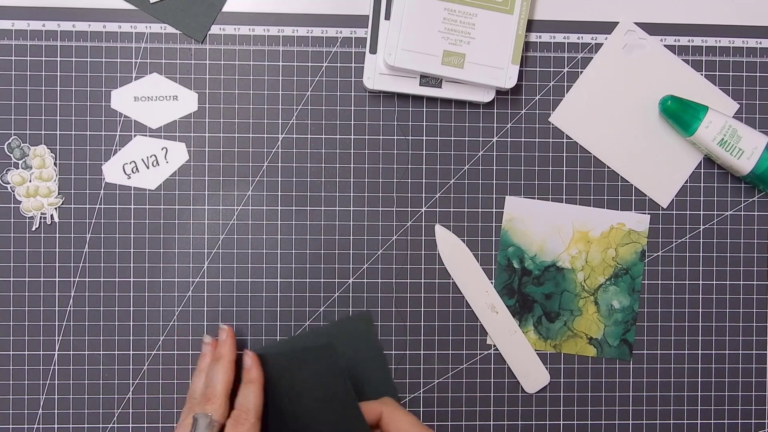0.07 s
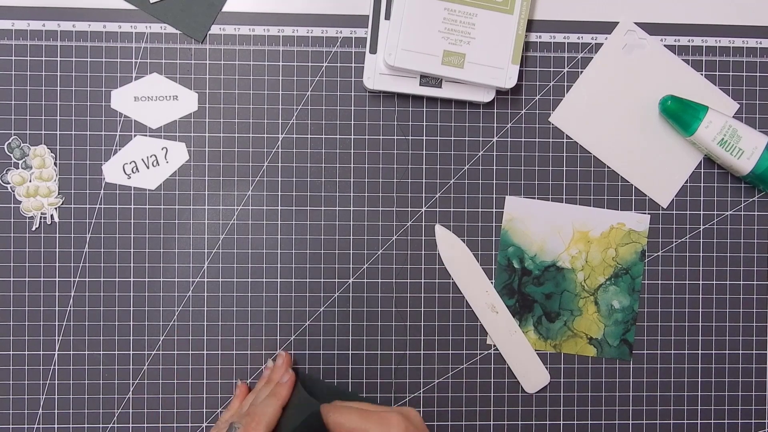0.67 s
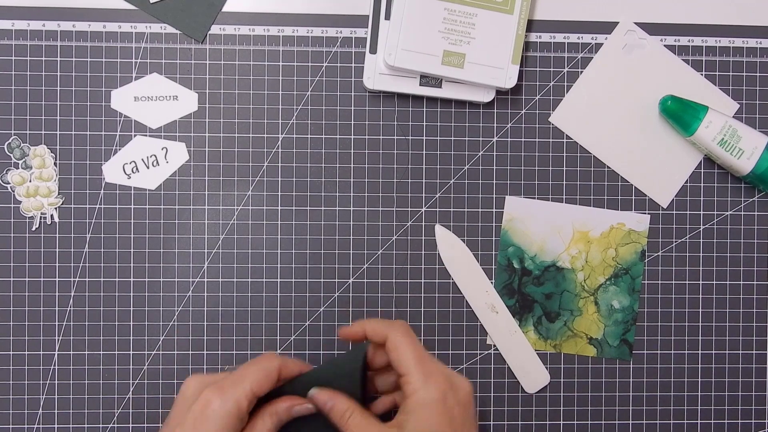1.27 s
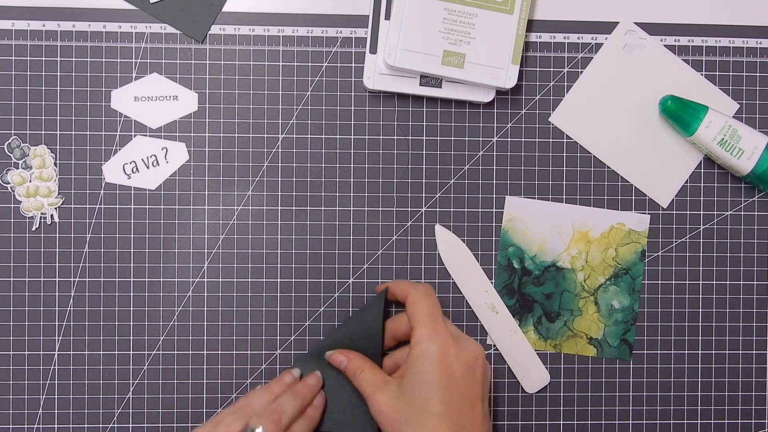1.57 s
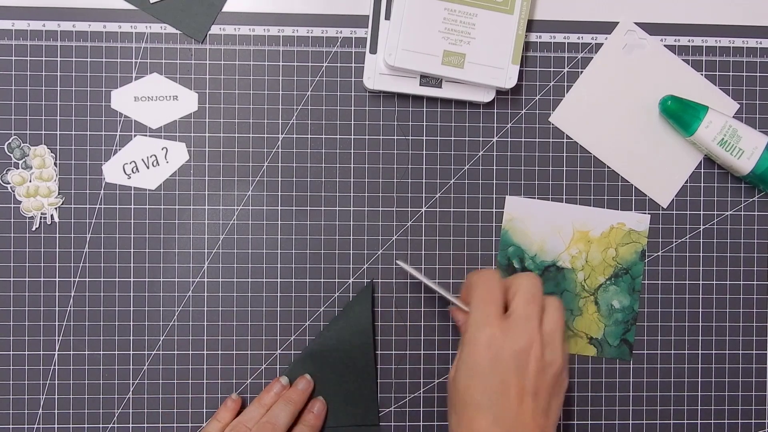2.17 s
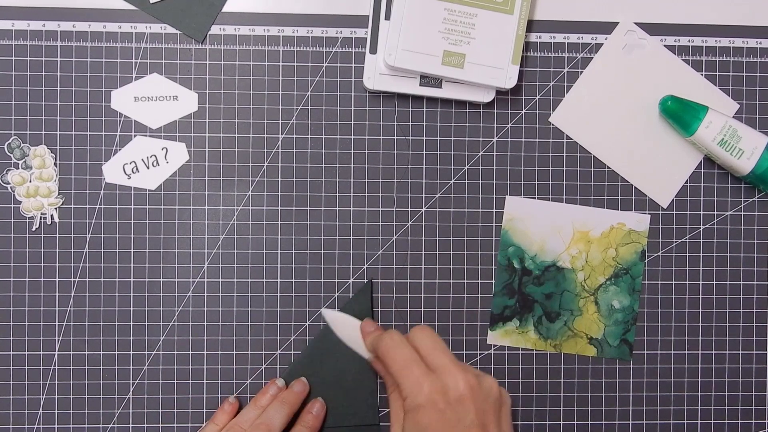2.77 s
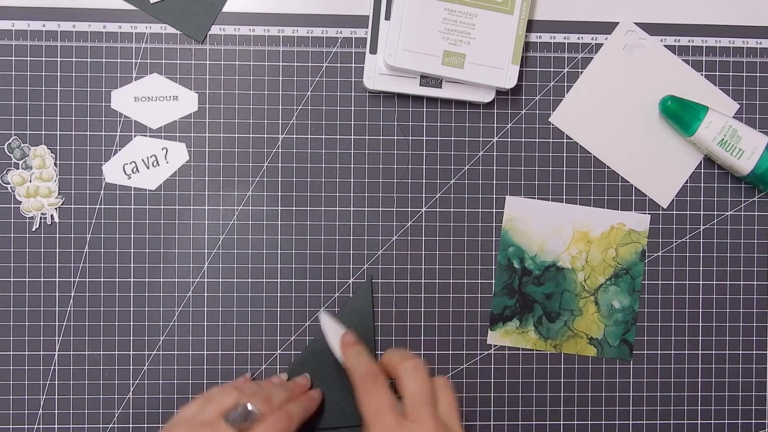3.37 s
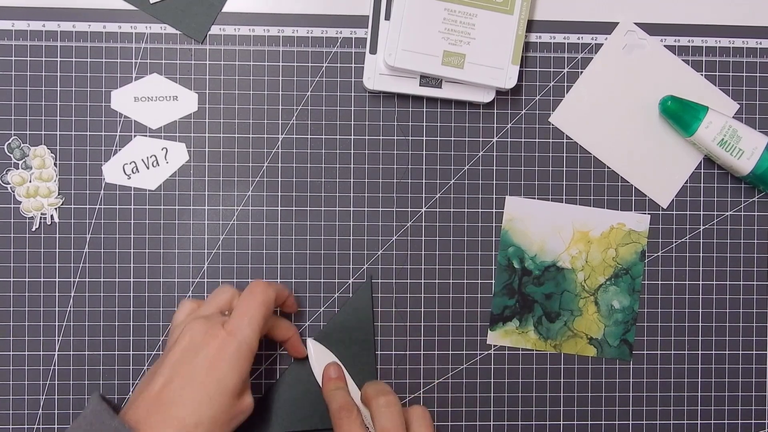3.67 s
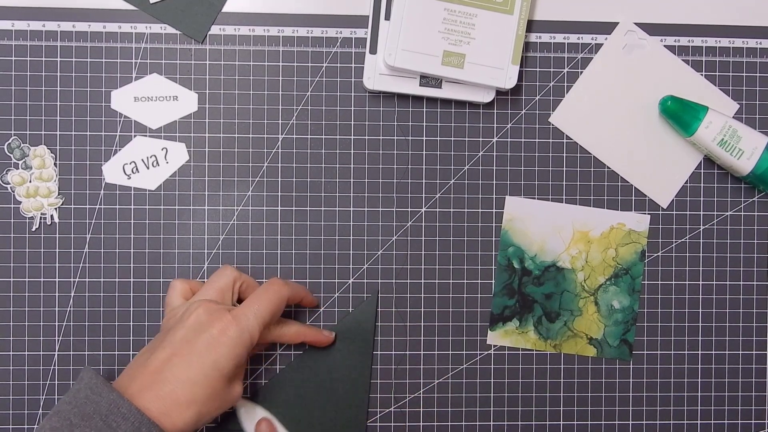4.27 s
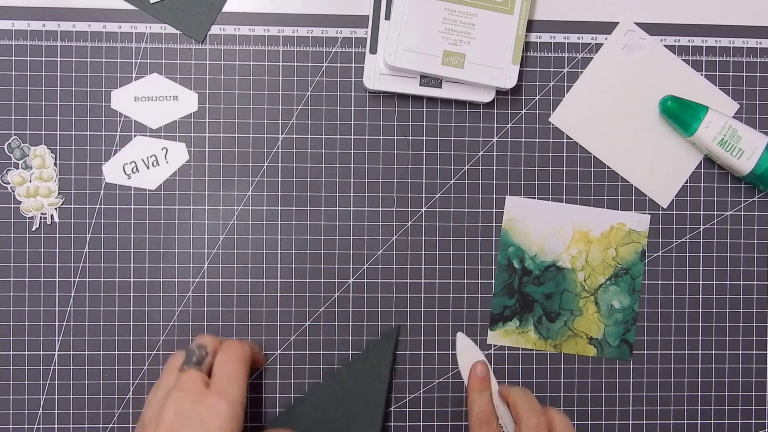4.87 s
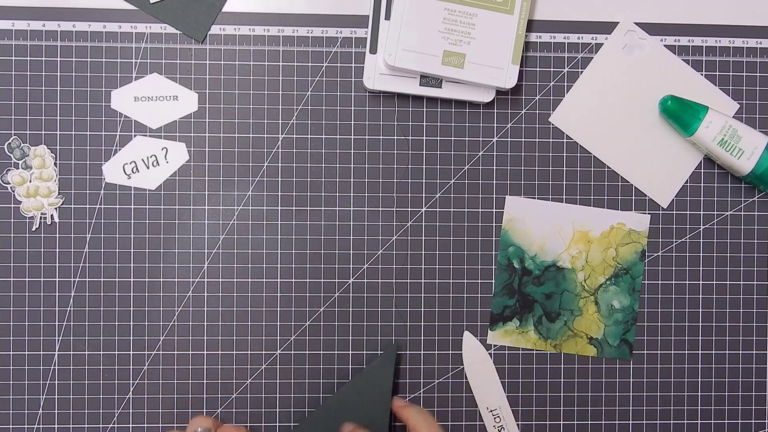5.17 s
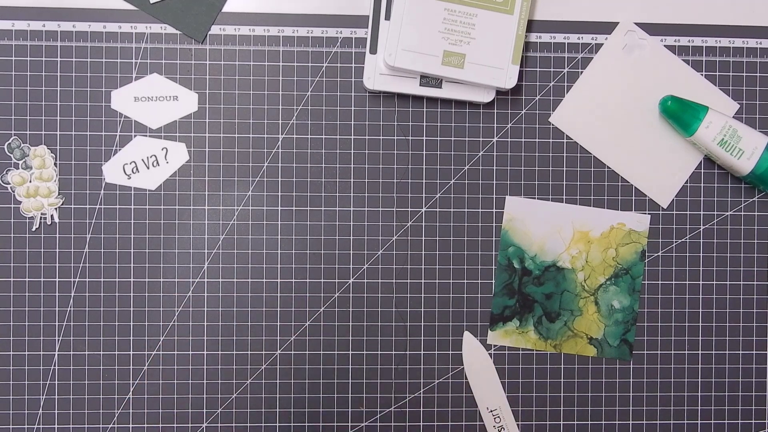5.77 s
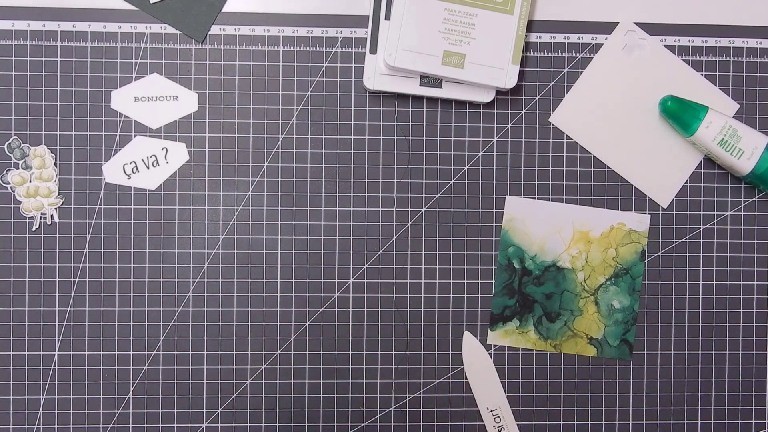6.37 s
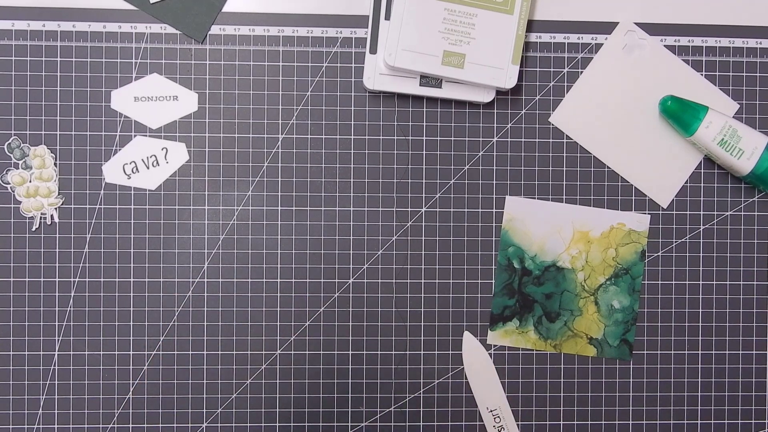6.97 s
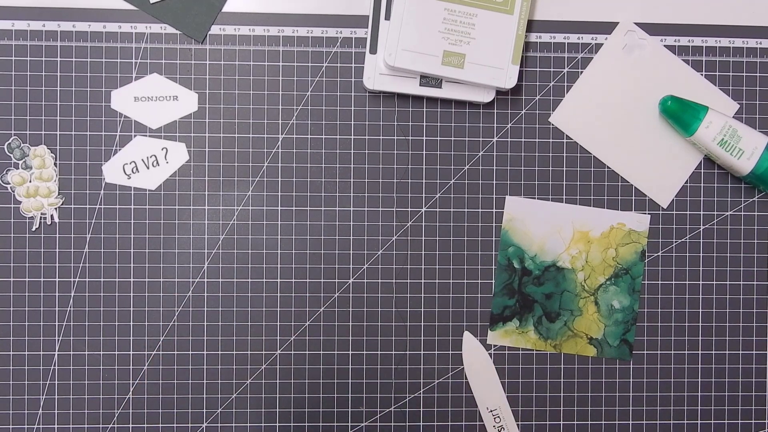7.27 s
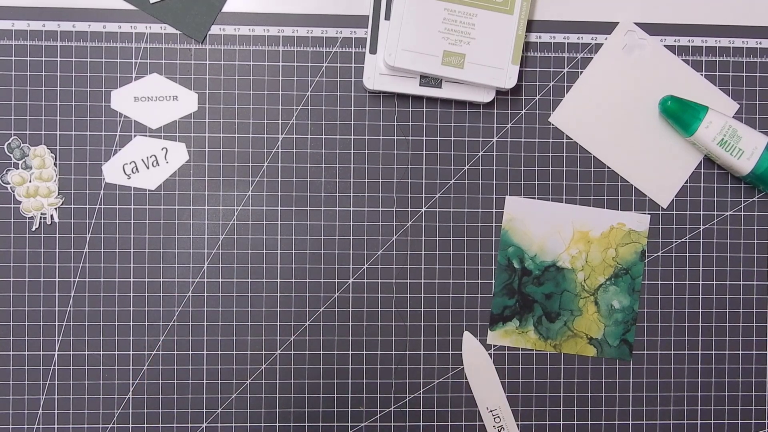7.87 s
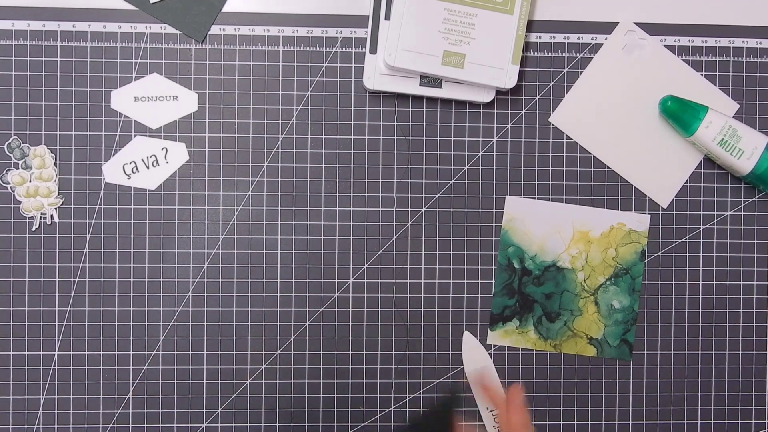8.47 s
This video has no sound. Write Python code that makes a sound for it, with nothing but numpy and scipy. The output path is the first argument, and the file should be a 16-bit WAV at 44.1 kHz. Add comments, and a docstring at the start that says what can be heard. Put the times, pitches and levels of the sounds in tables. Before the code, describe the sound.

Stiff cardstock is folded and creased by hand, rubbing, swishing and snapping, with light knocks on a cutting mat.

```python
"""Folding cardstock on a cutting mat.

A sheet is folded and its creases are pressed down with a bone folder. The stiff card snaps as it
buckles; friction makes it swish, rub and hiss under the fingers, and it ticks as it flexes.
Hands and folder knock on the mat, and the desk below rings.
A small room with a steady hiss is heard through a close pair of microphones."""
import sys
import numpy as np
from scipy import signal
from scipy.fft import rfft, irfft, next_fast_len
from scipy.io import wavfile

SR = 44100
rng = np.random.default_rng(int(sys.argv[2]) if len(sys.argv) > 2 else 0)


def unload_wav(signal):
    """Save mono or channel-first audio to the path in sys.argv[1] as 16-bit WAV at rate SR, clipped to [-1, 1]."""
    wavfile.write(
        sys.argv[1],
        SR,
        np.round(np.clip(np.atleast_2d(signal).T, -1, 1) * 32767).astype(np.int16),
    )


N = 380141
SHORT = 2 ** 14  # samples in one contact or room tail

# Resonances of the card on the mat. Each row: centre in Hz, width in Hz, lift in dB (negative: slight dip).
CARD_RESONANCES = [(299, 6.6, 17.5), (427, 59, 8.5), (1773, 13, 6), (2515, 74, 8), (2834, 150, 9.5),
                   (3216, 45, 17), (3486, 69, 12.5), (5280, 130, -20)]
# Each row: frequency in Hz, relative level in dB.
SNAP_SPECTRUM = [(50, -38), (170, -10), (500, -15), (1400, -25), (2300, -12), (3200, -5.5), (4000, -6),
                 (5200, 0.5), (9000, -13.5), (15000, -22)]
# Each row: start in seconds, chatter t60 in seconds, main resonance in Hz, ring level in dB,
# brightness in dB, focus in dB.
CARD_SNAPS = [(1.8015, 0.035, 4570, -32.5, 0, 1), (1.8457, 0.033, 3230, -17, 1, 6.5),
              (2.569, 0.066, 3020, -30, -1, 9.5), (3.472, 0.026, 2840, -44.5, -4, 12),
              (3.5941, 0.0087, 3020, -28.5, 1, 10), (4.692, 0.022, 2550, -43.5, -7, 8.5),
              (4.8066, 0.061, 2440, -23.5, -2.5, 9.5), (4.8338, 0.028, 2620, -29.5, -6, 6),
              (5.269, 0.036, 2720, -34, -6, 18), (5.4236, 0.04, 3260, -21.5, -2, 13.5),
              (5.4962, 0.02, 2200, -41, -12.5, 6), (5.617, 0.044, 2940, -34.5, -5, 2.5),
              (5.988, 0.033, 814, -47.5, -9.5, 7), (6.353, 0.018, 2820, -50, -2, 10),
              (6.925, 0.037, 3030, -53.5, -6, -3), (6.9733, 0.017, 2440, -44.5, -5, 0),
              (7.0064, 0.032, 755, -49, -8, 5), (7.4463, 0.037, 2420, -50, -7.5, 2),
              (7.986, 0.12, 2110, -42, -11, 10), (8.054, .03, 2550, -41.5, 4.5, 11),
              (8.3645, 0.031, 3000, -27.5, 6, 3.5), (8.5882, 0.037, 2950, -25.5, 0.5, 9)]


def snaps():
    """The stiff card buckles or an edge flicks free: it lets go all at once and rings."""
    out = np.zeros(N)
    for start_s, t60_s, main_hz, ring_db, bright_db, focus_db in CARD_SNAPS:
        force = chatter(t60_s, crack=0.32, grain=0.28, rise_s=0.00045)
        response = body(SNAP_SPECTRUM, [*CARD_RESONANCES, damped(main_hz, lift_db=17)], bins(SHORT))
        levels_db = register_levels(ring_db, bright_db, weight_db=-20, focus_db=focus_db)
        add(out, excite(force, response, levels_db), start_s)
    return out


# Each row: frequency in Hz, relative level in dB.
STROKE_SPECTRUM = [(50, -31), (200, -14), (380, -2), (700, 1.5), (1400, 2), (2700, 2.5), (3400, -3),
                   (4000, 1.5), (6000, -2.5), (10000, -11.5), (15000, -22.5)]
# Each row: peak time in seconds, rise in seconds, main resonance in Hz, ring level in dB,
# brightness in dB, weight in dB.
SHORT_STROKES = [(0.999, 0.094, 1040, -47.5, -11, 2.5), (1.25, 0.024, 660, -28.5, 1.5, -9),
                 (1.338, .02, 404, -39, 0, -2), (1.411, 0.013, 1540, -44, -13, -16),
                 (1.647, 0.0085, 2660, -39, 1.5, -15), (1.784, 0.023, 2750, -32.5, -0.5, -6),
                 (1.85, 0.038, 3380, -29.5, 6.5, -22), (2.265, 0.014, 495, -42, -9, 3),
                 (2.304, 0.02, 920, -35.5, -7.5, 0), (2.337, 0.01, 483, -29, -4.5, 5),
                 (2.366, 0.031, 1900, -21, -6.5, -7), (2.594, 0.022, 2820, -34, 1.5, -26),
                 (2.758, 0.026, 3100, -42.5, 1, -19), (2.797, 0.015, 2840, -41.5, 0, -25),
                 (3.613, 0.02, 3330, -32, 2, -11.5), (3.719, 0.048, 3100, -35.5, 4.5, -14),
                 (3.891, 0.016, 305, -39.5, -3.5, -0.5), (3.988, 0.033, 179, -38.5, 5.5, -12),
                 (4.845, 0.025, 2560, -34.5, -3, 3), (4.988, 0.023, 160, -26.5, -2, 3),
                 (5.323, 0.021, 2450, -31, -2, -20), (5.39, 0.051, 2900, -35, 3.5, -7),
                 (5.456, 0.025, 3310, -34.5, 0.5, -35), (5.53, 0.016, 1850, -30.5, -4.5, -24),
                 (5.639, 0.02, 3310, -43, -10.5, 6), (5.936, 0.037, 3180, -39, 4.5, -30),
                 (6.042, 0.0098, 694, -40.5, -10, -3.5), (6.159, 0.067, 3430, -42.5, 15, -28),
                 (6.368, 0.015, 2830, -32, 2.5, -8), (6.407, 0.022, 443, -53.5, -7, 19.5),
                 (6.465, 0.0037, 354, -47.5, 2, 10), (6.525, 0.037, 3180, -37.5, 5.5, -16),
                 (6.646, 0.0085, 340, -46.5, -2, 0.5), (7.067, 0.019, 490, -50.5, -10, 17),
                 (7.142, 0.025, 500, -34.5, -0.5, -13), (7.17, 0.011, 326, -31, -4.5, 10),
                 (7.545, 0.023, 2480, -27.5, 1, -13), (7.768, 0.016, 387, -43.5, 0.5, 1.5),
                 (7.996, 0.026, 2650, -46, -3, -25), (8.387, 0.037, 3230, -27.5, 4, -9),
                 (8.539, 0.036, 2880, -30, -1, -19), (8.607, 0.019, 2940, -21, 0.5, -11.5)]


def strokes():
    """Friction follows the speed of each short scrape; the free span of card sets the main resonance."""
    out = np.zeros(N)
    t = (np.arange(SHORT) - SHORT // 2) / SR
    for peak_s, rise_s, main_hz, ring_db, bright_db, weight_db in SHORT_STROKES:
        speed = swell(t, rise_s, fall_s=1.05 * rise_s, steepness=1.94)
        force = speed * fibres(SHORT, slips_per_s=1800, spread_db=0.5, grain=0.29)
        response = body(STROKE_SPECTRUM, [*CARD_RESONANCES, damped(main_hz, lift_db=11)], bins(SHORT))
        levels_db = register_levels(ring_db, bright_db, weight_db, focus_db=5.5)
        add(out, excite(force, response, levels_db), peak_s + t[0])
    return out


# Resonances of desk and mat. Each row: centre in Hz, width in Hz, lift in dB.
DESK_RESONANCES = [(172, 44, 9), (327, 10.3, 19.5), (460, 75, 8), (748, 180, 8), (1072, 34, 10.5),
                   (1730, 23, 2.5), (2420, 190, 4.5), (3070, 140, 6.5)]
# Each row: frequency in Hz, relative level in dB.
KNOCK_SPECTRUM = [(35, -25), (75, -13.5), (150, -5), (240, -9.5), (420, -5), (900, -8), (1600, -6.5),
                  (2900, -8), (4100, -12.5), (7000, -18), (12000, -21), (16000, -39)]
# Each row: start in seconds, chatter t60 in seconds, main resonance in Hz, ring level in dB,
# brightness in dB, weight in dB.
MAT_KNOCKS = [(1.2254, 0.049, 1880, -31.5, -10, -21), (1.4915, 0.04, 314, -36.5, -14.5, 6.5),
              (1.571, 0.052, 1150, -42.5, -12, 1.5), (2.15, 0.16, 177, -44, -3.5, 11),
              (2.3249, 0.074, 110, -32, -13.5, 6), (2.6068, 0.0098, 1190, -30, -4, -5),
              (3.2975, 0.027, 436, -21, -1, -10.5), (3.969, 0.07, 250, -45, -7, 9.5),
              (4.616, 0.037, 154, -44, -4.5, 18), (4.749, .023, 298, -37, -4.5, 2.5),
              (4.969, 0.062, 300, -25, -7, -1), (4.9915, .06, 2610, -18, -3, -7),
              (5.111, 0.021, 3200, -25.5, -4, -5.5), (5.1332, 0.036, 2700, -30, -5.5, -5),
              (7.1217, 0.063, 3260, -38, -7, -3), (7.164, .02, 1770, -33, -5.5, -17),
              (7.751, 0.021, 374, -56, 2, 17.5)]


def knocks():
    """Hands and folder hit the mat and ring the desk; where each lands sets the main resonance."""
    out = np.zeros(N)
    for start_s, t60_s, main_hz, ring_db, bright_db, weight_db in MAT_KNOCKS:
        force = chatter(t60_s, crack=0.26, grain=0.58, rise_s=0.00083)
        lift_db = 7.5 + 0.97 * max(weight_db, 0)  # a heavy, fleshy blow brings the resonance out
        response = body(KNOCK_SPECTRUM, [*DESK_RESONANCES, damped(main_hz, lift_db)], bins(SHORT))
        levels_db = register_levels(ring_db, bright_db, weight_db, focus_db=5)
        add(out, excite(force, response, levels_db), start_s)
    return out


# Rub and hiss of the sliding card. Each row: frequency in Hz, relative level in dB.
RUB_SPECTRUM = [(100, -46), (350, 3), (1000, 0.5), (1700, 2.5), (2600, 1.5), (3300, -3.5), (4000, -4),
                (6000, -21)]
HISS_SPECTRUM = [(2500, -6), (3600, -13), (4400, 9), (6300, 4), (9000, 1), (13000, -3), (16000, -58)]
# Each row: peak time in seconds, rise in seconds, rub level in dB, hiss relative to rub in dB.
SLOW_GLIDES = [(.11, 0.12, -50.5, -9.5), (.45, 0.082, -46, -9), (.65, 0.057, -52.5, -17),
               (0.889, 0.037, -46.5, -3.5), (1.14, 0.12, -46.5, -5), (1.4, 0.13, -45.5, -4),
               (1.7, 0.14, -45.5, -6), (2.85, 0.16, -55, -8), (3.309, 0.024, -41, -2), (3.7, .07, -64, -12),
               (3.88, 0.062, -49.5, -14), (4.11, 0.13, -56, -15), (4.37, 0.086, -51.5, -6.5),
               (4.72, 0.12, -57, -3), (4.99, 0.15, -44.5, -12), (5.33, 0.051, -44, -8),
               (5.57, 0.11, -44, -6.5), (5.87, 0.088, -55, 0), (6.09, 0.079, -50.5, -5.5),
               (6.35, 0.041, -52, 2), (6.56, 0.17, -54, -5.5), (6.75, 0.14, -54, -28),
               (7.0, 0.064, -48.5, -7), (7.24, 0.087, -53, -4.5), (7.5, 0.019, -44, -11),
               (7.89, 0.045, -49, -8), (8.07, 0.07, -52.5, -6), (8.19, 0.027, -50.5, -9),
               (8.47, 0.11, -47.5, -4)]


def glides():
    """Slow glides along the crease and over the mat drive a dull rub, a surface hiss and small ticks."""
    t = np.arange(N) / SR
    rub_power, hiss_power = from_db(-66.5) ** 2, from_db(-74) ** 2  # the fingers are never quite still
    for peak_s, rise_s, rub_db, hiss_db in SLOW_GLIDES:
        power = from_db(rub_db) ** 2 * swell(t - peak_s, rise_s, rise_s, steepness=2.0)
        rub_power = rub_power + power
        hiss_power = hiss_power + power * from_db(hiss_db) ** 2
    rub = sliding(RUB_SPECTRUM, rub_power, slips_per_s=70, grain=0.62, waver_db=-2.5)
    hiss = sliding(HISS_SPECTRUM, hiss_power, slips_per_s=560, grain=0.36, waver_db=2.43)
    return rub + hiss + ticks(rub_power)


def sliding(spectrum, power, slips_per_s, grain, waver_db):
    """Slow friction sounds the card, crackling where it catches; the finger pressure wavers."""
    size = next_fast_len(N)
    hz = bins(size)
    force = fibres(size, slips_per_s, spread_db=-2.5, grain=grain)
    low_cut = 1 / (1 + (180 / hz) ** 2)  # a small sheet radiates no bass
    response = body(spectrum, CARD_RESONANCES, hz) * low_cut
    sound = irfft(rfft(force) * response, size)[:N]
    return rms_one(sound) * np.sqrt(power) * from_db(waver_db * drift(rate_hz=45))


def ticks(rub_power, per_s=40, low_hz=1643, high_hz=3600, t60_s=0.061):
    """The flexing card ticks at random times and pitches, as strongly as it rubs."""
    out = np.zeros(N)
    t = np.arange(SHORT // 4) / SR
    for when, pitch, strength in rng.random((int(per_s * N / SR), 3)):
        hz = low_hz * (high_hz / low_hz) ** pitch
        over_rub_db = -3.5 + 12 * strength ** 2 - 60 * t / t60_s
        add(out, np.sin(2 * np.pi * hz * t) * from_db(over_rub_db), when * N / SR)
    return out * np.sqrt(rub_power)


def fibres(size, slips_per_s, spread_db, grain):
    """Friction force: fibres catch and let go in uneven slips; grain is their rms over a smooth hiss."""
    slips = (rng.random(size) < slips_per_s / SR) * rng.choice([-1, 1], size)
    strength = from_db(spread_db * np.minimum(rng.exponential(1, size), 3))
    return rms_one(rng.standard_normal(size) + grain * rms_one(slips * strength))


def chatter(t60_s, crack, grain, rise_s):
    """Contact force: one crack and a dying chatter of tiny touches."""
    t = np.arange(SHORT) / SR
    pressure = (1 - np.exp(-t / rise_s)) * from_db(-60 * t / t60_s)
    force = pressure * fibres(SHORT, slips_per_s=3600, spread_db=4.0, grain=grain)
    force /= np.linalg.norm(force)
    force[0] = crack
    return force


def swell(t, rise_s, fall_s, steepness):
    """A hand movement gathers speed, peaks at t = 0 and dies away."""
    return np.exp(-np.abs(t / np.where(t < 0, rise_s, fall_s)) ** steepness)


def damped(centre_hz, lift_db):
    """A resonance broadened by the damping of mat and fingers."""
    width_hz = 90 + centre_hz / 12
    return centre_hz, width_hz, lift_db


def body(spectrum, resonances, hz):
    """Response of an object: a broad spectrum with resonances on top."""
    power = np.ones(len(hz))
    for centre_hz, width_hz, lift_db in resonances:
        power += (from_db(lift_db) ** 2 - 1) / (1 + (2 * (hz - centre_hz) / width_hz) ** 2)
    return from_db(at_hz(spectrum, hz)) * np.sqrt(np.maximum(power, 0.5))


def register_levels(ring_db, bright_db, weight_db, focus_db):
    """Thud, clack, ring, hiss in dB: focus lowers clack and hiss, brightness trades one for the other."""
    return ring_db + np.array([weight_db, -focus_db - bright_db, 0, -focus_db + bright_db])


def excite(force, response, levels_db, edges_hz=(550, 1900, 3700)):
    """A force drives a body; the contact sets the energy in its four registers."""
    hz, drive = bins(SHORT), rfft(force)
    # a light, hissy touch reaches further into the treble
    lightness_db = levels_db[-1] - levels_db[-2] + 6
    treble_octaves = np.log2(np.maximum(hz / 5500, 1))
    response = response * from_db(0.55 * lightness_db * treble_octaves)
    above = [1 / (1 + (edge / hz) ** 12) for edge in edges_hz]
    registers = -np.diff([np.ones(len(hz)), *above, np.zeros(len(hz))], axis=0)
    energy = registers @ np.abs(drive * response) ** 2 * 2 / SHORT
    wanted = from_db(levels_db) ** 2 * SR / 100  # levels are rms over 10 ms
    balance = np.sqrt((wanted / energy) @ registers)
    return irfft(drive * causal(response * balance))


def causal(gain):
    """Minimum-phase response with this gain: nothing rings before the touch."""
    cepstrum = irfft(np.log(gain + 1e-9))
    half = len(cepstrum) // 2
    cepstrum[1:half] *= 2
    cepstrum[half + 1:] = 0
    return np.exp(rfft(cepstrum))


def scatter(x, above_hz, t60_s):
    """Small things on the desk throw back the treble, differently to each microphone."""
    t = np.arange(SHORT // 8) / SR
    echoes = rng.standard_normal((2, len(t))) * from_db(-60 * t / t60_s)
    echoes /= np.linalg.norm(echoes, axis=1, keepdims=True)
    echoes = signal.sosfilt(signal.butter(3, above_hz, "high", fs=SR, output="sos"), echoes)
    return signal.oaconvolve(x[None], echoes, axes=1)[:, :N]


# Each row: frequency in Hz, t60 in seconds, left-right correlation.
ROOM_DECAY = [(100, 0.3, 0.96), (300, 0.13, 1), (1000, 0.31, 1), (2940, 0.21, 0.86), (6000, 0.27, 0.46),
              (15000, 0.21, 0.12)]


def room(x, first_s, build_s):
    """Reflections build up after the first one arrives and die away octave by octave."""
    t, hz = np.arange(SHORT) / SR, bins(SHORT)
    noise = diffuse(SHORT, ROOM_DECAY)
    centres_hz = np.geomspace(100, 12800, 8)
    tail = np.zeros((2, SHORT))
    for centre_hz, pick in zip(centres_hz, np.eye(len(centres_hz))):
        band = irfft(noise * np.interp(np.log(hz), np.log(centres_hz), pick))
        tail += band * from_db(-60 * t / at_hz(ROOM_DECAY, centre_hz))
    tail *= np.clip((t - first_s) / build_s, 0, 1)
    return signal.oaconvolve(x[None], rms_one(tail) / np.sqrt(SHORT), axes=1)[:, :N]


# Each row: frequency in Hz, relative level in dB, left-right correlation.
ROOM_HISS_SPECTRUM = [(20, -13, .75), (45, -14.5, .75), (80, -5.5, 0.42), (117, -4.5, 0.4),
                      (156, 3.5, 0.55), (253, 2, 0.32), (454, -2.5, 0.46), (600, -6.5, 0.12),
                      (1610, -12, 0.34), (2080, -18.5, 0.13), (3200, -17, 0.37), (4000, -22.5, 0.2),
                      (6960, -31.5, 0.88), (14000, -70, .4)]


def room_hiss(level_db):
    """The steady, dull hiss of the room."""
    size = next_fast_len(N)
    spectra = diffuse(size, ROOM_HISS_SPECTRUM) * from_db(at_hz(ROOM_HISS_SPECTRUM, bins(size)))
    return from_db(level_db) * rms_one(irfft(spectra, size)[:, :N])


def diffuse(size, table):
    """Left and right spectra of noise arriving from all around."""
    mid, side = rfft(rng.standard_normal((2, size)))
    correlation = np.clip(at_hz(table, bins(size), column=2), -1, 1)
    return np.sqrt(1 + correlation) * mid + np.sqrt(1 - correlation) * side * [[1], [-1]]


def drift(rate_hz):
    """A slow random curve of rms 1."""
    knots = rng.standard_normal(int(N / SR * rate_hz) + 2)
    return rms_one(np.interp(np.arange(N) / SR * rate_hz, np.arange(len(knots)), knots))


def from_db(db):
    """Decibels to gain."""
    return 10 ** (np.asarray(db) / 20)


def rms_one(x):
    """Scale to rms 1."""
    return x / np.sqrt(np.mean(x ** 2) + 1e-20)


def bins(size):
    """Real FFT frequencies, at least 1 Hz."""
    return np.maximum(np.fft.rfftfreq(size, 1 / SR), 1)


def at_hz(rows, hz, column=1):
    """Read a table column on a log-frequency axis."""
    table = np.array(rows)
    return np.interp(np.log(hz), np.log(table[:, 0]), table[:, column])


def add(out, sound, start_s):
    """Mix a sound into a track."""
    start = max(round(start_s * SR), 0)
    out[start:start + len(sound)] += sound[:max(N - start, 0)]


def scene():
    """Knocks, snaps and friction on the desk, each with its share of the room."""
    blows, flicks, friction = knocks(), snaps(), strokes() + glides()
    direct = blows + flicks + friction
    # the hands wander over the mat, so one pattern of echoes gives way to another
    place = 2 * drift(rate_hz=6)
    shares = np.cos(place), np.sin(place)
    near = from_db(1.0) * sum(scatter(direct * share, above_hz=4980, t60_s=0.036) for share in shares)
    sent = from_db(-2.5) * blows + from_db(-8.0) * flicks + from_db(-7.5) * friction
    far = sum(room(sent * share, first_s=0.0044, build_s=0.001) for share in shares)
    return direct + near + far + room_hiss(level_db=-49)


# Each row: frequency in Hz, left level over right in dB, left phase lead in radians.
MICROPHONE_PAIR = [(100, 0, 0), (500, -0.8, 0.5), (1610, -1, 0.5), (4530, -2, 0.19), (7200, -1, 0.83),
                   (10400, 1.5, 2), (13200, -2, 5), (15500, 7, -13.5)]
CUTOFF_HZ = 15300


def record(dry):
    """The two microphones differ in level and phase; the top treble is cut."""
    size = next_fast_len(N + SHORT)
    hz = bins(size)
    left = from_db(at_hz(MICROPHONE_PAIR, hz) / 2)
    right = np.exp(-1j * at_hz(MICROPHONE_PAIR, hz, column=2)) / left
    heard = irfft(rfft(dry, size) * np.array([left, right]), size)[:, :N]
    return signal.sosfilt(signal.ellip(10, 0.1, 80, CUTOFF_HZ, fs=SR, output="sos"), heard)


dry = scene()
out = record(dry)
unload_wav(out)
```